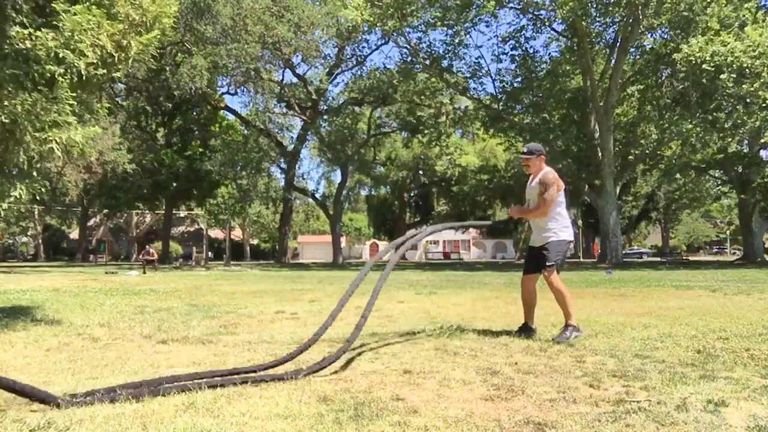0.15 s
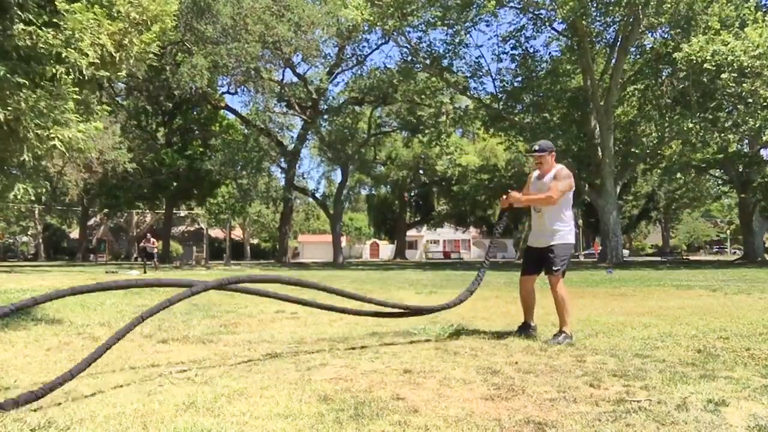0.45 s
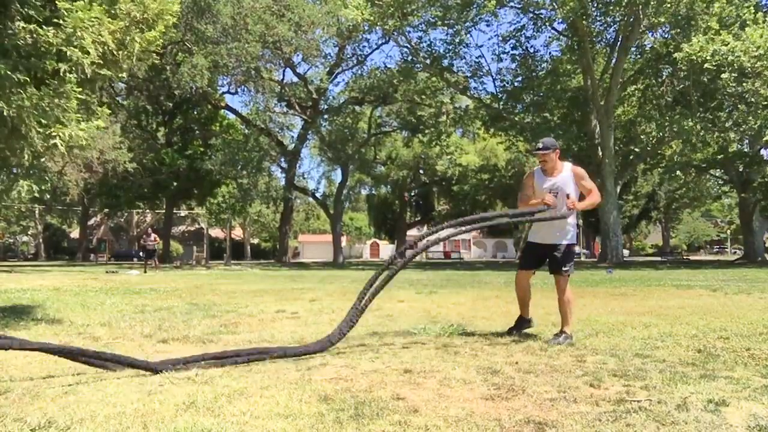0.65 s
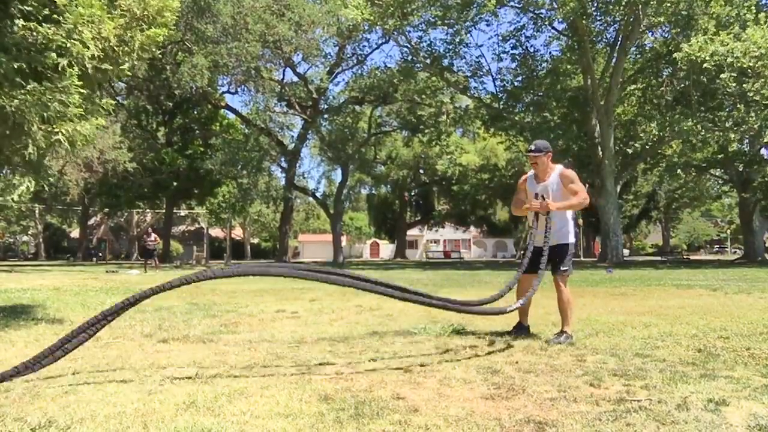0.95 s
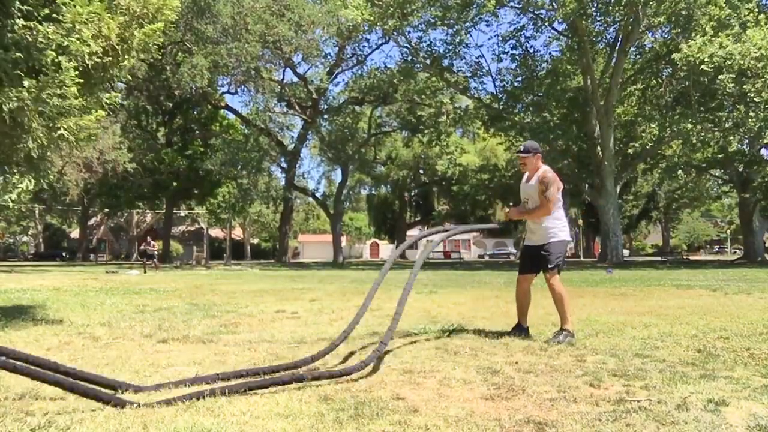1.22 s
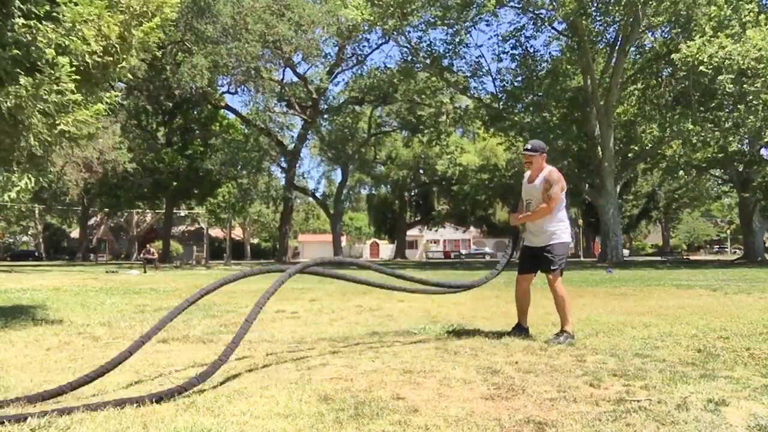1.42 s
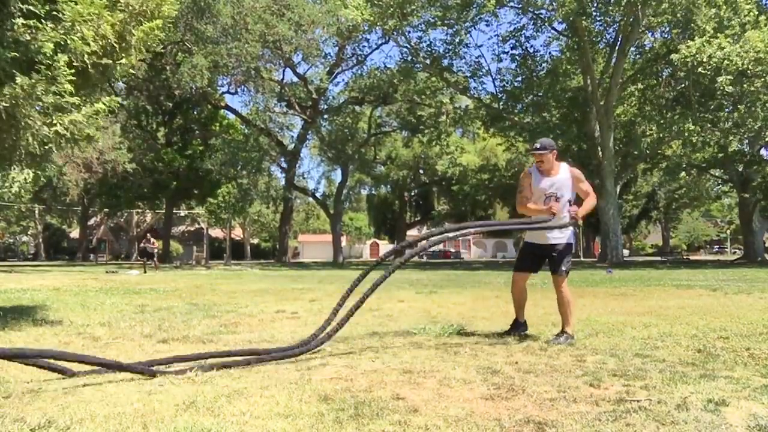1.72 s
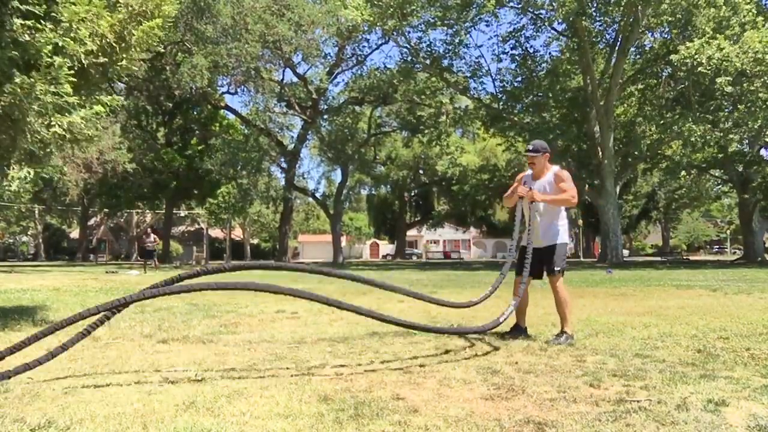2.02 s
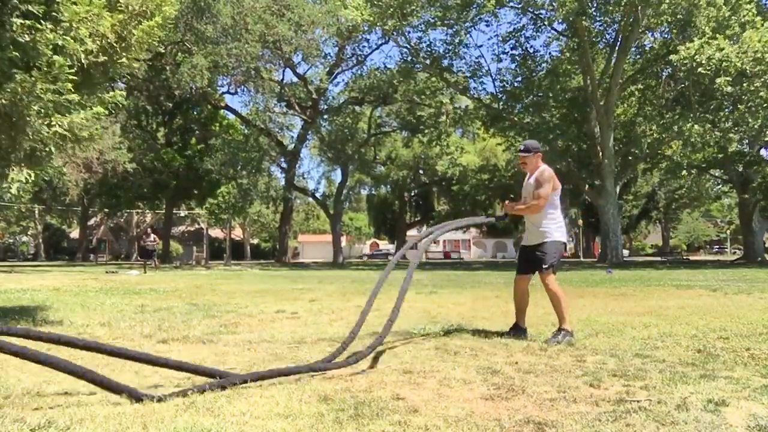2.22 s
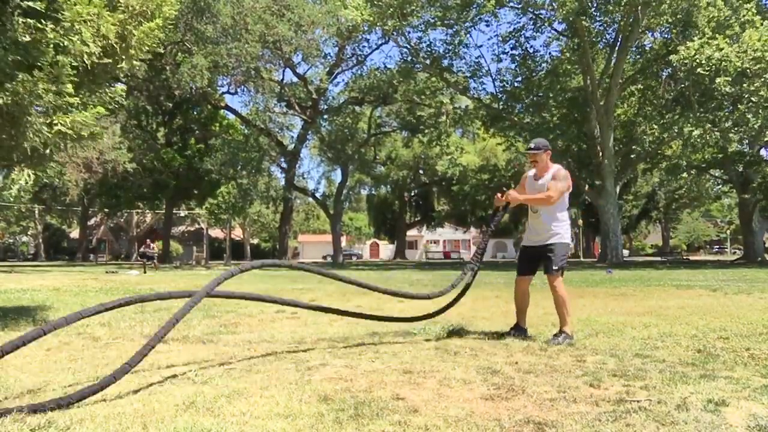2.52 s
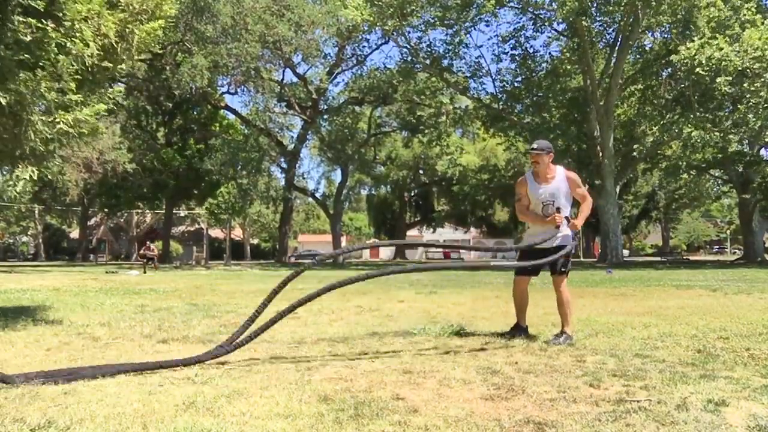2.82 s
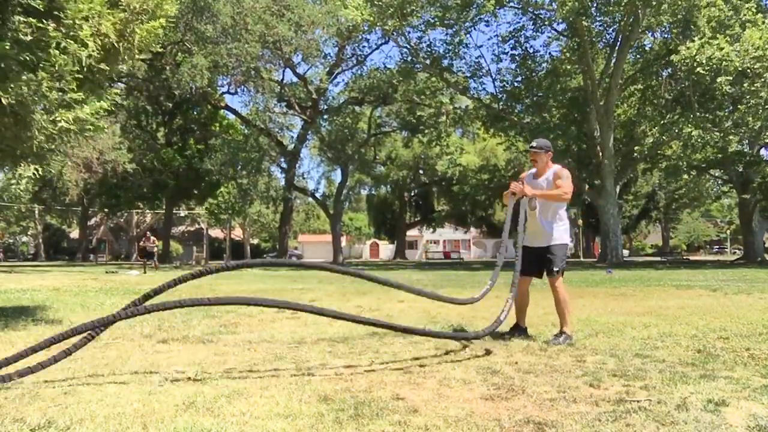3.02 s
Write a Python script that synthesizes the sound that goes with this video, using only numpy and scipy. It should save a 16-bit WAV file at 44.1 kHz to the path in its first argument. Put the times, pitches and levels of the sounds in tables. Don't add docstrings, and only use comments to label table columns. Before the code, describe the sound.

Battle ropes sweeping and slapping dry turf in waves, with low gusty wind buffeting outdoors

```python
import sys
import numpy as np
from scipy import signal
from scipy.io import wavfile
from scipy.ndimage import uniform_filter1d

SR = 44100
rng = np.random.default_rng(int(sys.argv[2]) if len(sys.argv) > 2 else 0)


def decibels_to_gain(level_db):
    exponent = np.asarray(level_db, float) / 20
    return 10 ** exponent


def int16_out(signal):
    q = np.round(np.clip(np.atleast_2d(signal).T, -1, 1) * 32767)
    wavfile.write(sys.argv[1], SR, q.astype(np.int16))


N = 138915


def rms_one(x):
    return x / np.sqrt(np.mean(x ** 2) + 1e-20)


def band(x, low_hz, high_hz):
    return signal.sosfilt(signal.butter(2, [low_hz, high_hz], "band", fs=SR, output="sos"), x)


def resonance(x, hz, width_hz):
    r = np.exp(-np.pi * width_hz / SR)
    return signal.lfilter([1], [1, -2 * r * np.cos(2 * np.pi * hz / SR), r * r], x)


def drift(rate_hz):
    r = np.exp(-80 * np.pi * rate_hz / SR)
    noise = rng.standard_normal(N // 40 + 2002)
    slow = signal.lfilter([1], [1, -2 * r, r * r], noise)[2000:]
    return np.interp(np.arange(N) / 40, np.arange(len(slow)), rms_one(slow))


def grains(per_s, spread_db):
    sizes = decibels_to_gain(spread_db * np.minimum(rng.exponential(1, N), 5))
    signs = rng.choice([-1, 1], N)
    happens = rng.random(N) < per_s / SR
    return rms_one(sizes * signs * happens)


def coloured(pair, spectrum, patchy_db):
    hz, db = np.transpose(spectrum)
    edges = 177 * 2 ** np.arange(0, 6.6, 0.5)
    out = 0
    for k, (low, high) in enumerate(zip(edges, edges[1:])):
        level_db = np.interp(np.log(low * high) / 2, np.log(hz), db)
        gain = decibels_to_gain(level_db + patchy_db * drift(14.7))
        out = out + gain * band(pair[k % 2], low, high)
    return rms_one(out)


def swells(s, rise, fall, db):
    grid = np.arange(0, N + 16, 16) / SR
    t = grid - np.asarray(s)[:, None]
    width = np.where(t < 0, np.asarray(rise)[:, None], np.asarray(fall)[:, None])
    peak_power = decibels_to_gain(db)[:, None] ** 2
    power = np.sum(peak_power * np.exp(-2 * (t / width) ** 2), axis=0)
    return np.interp(np.arange(N) / SR, grid, np.sqrt(power))


def evened(x):
    evenness = 0.55
    x = rms_one(x)
    local_power = uniform_filter1d(x ** 2, size=600) + 0.024
    return rms_one(x / local_power ** (evenness / 2))


def knocks(rows, cycles):
    half = 1800
    out, t = np.zeros(N + SR), np.arange(-half, half) / SR
    for s, db, hz in rows:
        i = int(s * SR)
        bell = np.exp(-(t * hz / cycles) ** 2 * 2)
        out[i - half:i + half] += decibels_to_gain(db) * bell * np.sin(2 * np.pi * hz * t)
    return out[:N]


# f/Hz, level/dB [per Hz]
PARK_SPECTRUM = [(150, -2), (250, -18.5), (603, -17.5), (1330, -17), (1850, -24), (3010, -27),
                 (3510, -31.5), (4390, -34), (15500, -45.5)]


def park():
    return decibels_to_gain(-57) * coloured(rng.standard_normal((2, N)), PARK_SPECTRUM, patchy_db=1.0)


# t/s, level/dB
STEADY_LEVEL = [(0.0, -49.5), (0.2, -44), (0.6, -45), (0.67, -59), (0.73, -44.5), (1.33, -47), (1.49, -48.5),
                (1.62, -43.5), (1.74, -43.5), (2.18, -48.5), (2.29, -42.5), (2.43, -45.5), (2.55, -43.5),
                (2.84, -42), (3.01, -41.5), (3.15, -49.5)]
# t/s, peak level/dB, flutter
# level above 200 Hz/dB [relative], length/s
AIR_EDDIES = [(0.204, -38, -40, 0.023), (0.282, -28, -24, 0.003), (0.485, -29, -17, 0.059),
              (0.513, -23, -13, 0.013), (0.537, -32, -26, 0.017), (0.558, -24, -36, 0.013),
              (0.59, -20.5, -15.5, 0.0076), (0.62, -21.5, -32, 0.0081), (0.628, -30.5, -29, 0.019),
              (0.657, -37.5, -37, 0.02), (0.754, -33.5, -16, 0.033), (0.768, -30.5, -10, 0.028),
              (0.792, -33.5, -11, 0.073), (0.825, -26, -7, 0.019), (0.843, -31, -10, 0.012),
              (0.851, -30.5, -7.5, 0.015), (0.87, -26.5, -9.5, 0.007), (0.877, -27.5, -6, 0.0098),
              (0.895, -34.5, -11.5, 0.037), (0.927, -30.5, -8.5, 0.023), (0.945, -25.5, -7.5, 0.0069),
              (0.963, -30.5, -8, 0.021), (1.045, -25.5, -20.5, 0.018), (1.077, -33.5, -36, 0.02),
              (1.17, -28, -19, 0.021), (1.195, -30.5, -18, 0.018), (1.26, -37.5, -17.5, 0.0092),
              (1.285, -35, -28, 0.023), (2.068, -40.5, -34, 0.025), (2.296, -34, -28, 0.033),
              (0.084, -55, -38, 0.0086), (0.126, -39, -38, 0.015), (0.362, -36.5, -18.5, 0.019),
              (0.425, -36, -24, 0.009), (1.107, -35, -26, 0.012), (1.126, -38, -31, 0.045),
              (1.424, -37, -27, 0.0079), (1.492, -37, -15.5, 0.014), (1.583, -39, -10, 0.017),
              (1.7, -49, -30, 0.019), (1.775, -32, -34, 0.0076), (1.919, -34.5, -20.5, 0.02),
              (2.13, -38, -18, 0.042), (2.383, -37, -15.5, 0.016), (2.548, -39.5, -10, 0.03),
              (2.629, -34.5, -14, 0.012), (2.739, -38, -28, 0.011), (2.813, -40, -33, 0.0056),
              (3.122, -38, -20, 0.011)]


def wind():
    gusty = grains(160, 2.5) + rng.standard_normal(N)
    rumble = resonance(rng.standard_normal(N), 80.6, 130)
    rumble = evened(band(rumble, 59.2, 265))
    thump = evened(band(resonance(gusty, 142.3, 141), 66, 266))
    low_hz, split_hz, high_hz = 206, 391, 600
    dull = evened(band(band(gusty, low_hz, split_hz), low_hz / 2, split_hz))
    bright = evened(band(band(gusty, split_hz, high_hz), low_hz, high_hz * 1.46))

    push_db = np.interp(np.arange(N) / SR, *np.transpose(STEADY_LEVEL)) + 1.0 * drift(21)
    steady = decibels_to_gain(push_db - 0.5) * (rumble + decibels_to_gain(-24) * dull)

    s, db, flutter_db, length = np.transpose(sorted(AIR_EDDIES))
    rise = 0.0071 + 0 * s
    length = np.clip(length, 0.004, 0.08)
    flutter_db = db + flutter_db + 4
    bright_db = flutter_db + 0.5 + 0.39 * (flutter_db + 28)
    thumps = swells(s + rise, rise, length, db - 3) * thump
    dull_flutter = swells(s + rise, rise, length * 0.55, flutter_db) * dull
    bright_flutter = swells(s + rise, rise * 0.52, length * 0.56, bright_db) * bright
    return steady + thumps + dull_flutter + bright_flutter


# t/s, length/s, start f/Hz, end f/Hz, level/dB
BIRD_CHIRPS = [(0, .11, 2850, 2830, -73.5), (.12, .04, 2850, 2800, -72), (1.4, .03, 3500, 3400, -70),
               (1.64, .03, 3950, 3600, -72), (1.662, .026, 3530, 3490, -68), (1.705, .025, 3520, 3500, -72),
               (1.745, .025, 5200, 5100, -69), (1.795, .025, 5150, 5200, -71),
               (1.828, .032, 3780, 3480, -66), (1.882, .02, 3450, 3400, -69), (2.18, .016, 3400, 3400, -69),
               (2.213, .026, 3600, 3500, -67), (2.243, .012, 3520, 3400, -64),
               (3.014, .014, 7200, 3400, -57), (3.019, .012, 6000, 3000, -64),
               (3.103, .01, 7900, 8500, -63)]


def birds():
    out = np.zeros(N + SR)
    wobble = 1 + 0.011 * np.resize(drift(120), N + SR)
    for s, length, start_hz, end_hz, db in BIRD_CHIRPS:
        i, n = int(max(s, 0) * SR), int(length * SR)
        hz = np.geomspace(start_hz, end_hz, n) * wobble[i:i + n]
        whistle = np.sin(2 * np.pi * np.cumsum(hz) / SR)
        out[i:i + n] += decibels_to_gain(db) * signal.windows.tukey(n, 0.6) * whistle
    lag = int(0.009 * SR)
    for turn in range(1, 4):
        out = out + 0.3 ** turn * np.roll(out, lag * turn + 97 * turn ** 2)
    return out[:N] * decibels_to_gain(2.5 + 3.5 * drift(28))


# loudest t/s, rise/s, fall/s, level/dB
ROPE_SWEEPS = [(.02, 0.068, 0.07, -62), (.15, 0.06, 0.11, -54), (.28, 0.054, 0.041, -58.5),
               (.37, 0.086, 0.086, -53), (.49, 0.043, 0.036, -53), (.74, 0.13, 0.2, -59),
               (.92, 0.03, 0.055, -57), (1.04, 0.093, 0.048, -60.5), (1.29, 0.096, 0.11, -52.5),
               (1.5, 0.12, 0.07, -53.5), (1.62, 0.077, 0.051, -57), (1.79, 0.078, 0.18, -55.5),
               (1.98, 0.045, 0.094, -55.5), (2.109, 0.038, 0.049, -56.5), (2.26, 0.047, 0.11, -53),
               (2.37, 0.064, 0.19, -52.5), (2.55, 0.073, 0.067, -53.5), (2.648, .03, 0.039, -57.5),
               (2.75, 0.059, 0.16, -60.5), (2.86, 0.12, 0.039, -55), (3.0, 0.098, 0.23, -58.5),
               (3.12, 0.031, 0.05, -57)]
# f/Hz, level/dB [per Hz]
SWISH_SPECTRUM = [(500, 10.5), (900, 9.5), (1500, 6), (2300, 1.5), (4500, -5), (7500, -5.5), (11000, -8.5),
                  (15500, -9)]


def sweeps():
    blades = [grains(4500, 3.86) + rng.standard_normal(N) for _ in range(2)]
    swish = coloured(blades, SWISH_SPECTRUM, patchy_db=1.6)
    return swells(*np.transpose(ROPE_SWEEPS)) * decibels_to_gain(1.14 * drift(29)) * swish


# centre t/s, peak level/dB, f/Hz
AIR_LUMPS = [(0.115, -34.5, 91), (0.435, -35, 100), (0.521, -31, 413), (0.548, -26, 123), (0.68, -32.5, 98),
             (0.785, -30, 141), (0.805, -28, 135), (0.87, -29, 600), (0.963, -35, 616), (1.01, -32, 99),
             (1.105, -34, 188), (1.183, -32, 182), (1.21, -38, 110), (1.43, -36, 98), (1.595, -36, 109),
             (1.68, -36, 85), (1.79, -39, 112), (2.075, -30.5, 168), (2.48, -34.5, 90), (2.6, -40, 98),
             (2.75, -35, 90), (2.82, -39, 101), (2.875, -37, 100), (3.04, -41.5, 168)]


def lumps():
    return knocks(AIR_LUMPS, cycles=1.53)


# centre t/s, peak level/dB, f/Hz
AIR_JOLTS = [(0.296, -30.5, 168), (0.497, -29, 313), (0.52, -17.5, 214), (0.566, -29, 190),
             (0.5965, -15.5, 120), (0.598, -26, 260), (0.614, -21, 207), (0.636, -28, 197),
             (0.76, -29.5, 140), (0.788, -38, 162), (0.831, -19, 510), (0.84, -22, 151), (0.84, -26, 630),
             (0.838, -42, 950), (0.857, -19, 255), (0.883, -36, 506), (0.905, -22, 200), (0.936, -35, 332),
             (0.957, -17.5, 125), (0.951, -47, 514), (0.972, -32, 130), (1.05, -26, 213),
             (1.081, -34.5, 211), (1.198, -27, 218), (1.265, -29.5, 139), (1.283, -26, 159),
             (2.305, -31, 160), (2.4, -38.5, 119)]


def jolts():
    return knocks(AIR_JOLTS, cycles=0.68)


# t/s, peak level/dB, length/s
ROPE_SLAPS = [(0.3746, -50, 0.0047), (0.484, -43.5, 0.0062), (0.49, -39, 0.014), (0.714, -48, 0.0044),
              (1.026, -40, 0.0095), (1.059, -43, 0.0039), (1.513, -44, 0.0068), (1.63, -35.5, 0.013),
              (2.102, -44.5, 0.0049), (2.123, -43, 0.0059), (2.5504, -39.5, 0.0042), (2.566, -36, 0.0038),
              (2.631, -30, 0.0038), (2.649, -31.5, 0.0027), (2.721, -46, 0.004), (3.027, -42, 0.0047),
              (3.103, -40.5, 0.0035), (3.12, -39, 0.01)]
# f/Hz, level/dB [per Hz]
SLAP_SPECTRUM = [(200, 23.5), (450, 16), (800, 7.5), (1500, 7.5), (2800, 4.5), (5000, -5.5), (8000, -3.5),
                 (15500, -16.5)]


def slaps():
    s, db, length = np.transpose(ROPE_SLAPS)
    rise = 0.0022 + 0 * s
    crackle = coloured([grains(6000, 3), grains(6000, 3)], SLAP_SPECTRUM, patchy_db=0)
    return crackle * swells(s + rise, rise, np.clip(length, 0.002, 0.03), db - 5.5)


# t/s, peak level/dB, f/Hz
STALK_TICKS = [(1.03, -57, 4000), (1.634, -48, 2300), (1.635, -40, 3000), (2.111, -43, 1800),
               (2.1205, -38.5, 1200), (2.1215, -39, 2800), (2.244, -43, 1010), (2.249, -44, 700),
               (2.559, -38, 1400), (2.633, -37, 1800), (2.632, -33, 5550), (2.649, -35, 1300),
               (2.722, -39, 1880), (3.1015, -38, 10000), (3.107, -40, 3000), (3.125, -53, 2000)]


def ticks():
    return knocks(STALK_TICKS, cycles=0.86)


def scene():
    air = wind() + lumps() + jolts()
    ropes = sweeps() + slaps() + ticks()
    return (park() + air + birds() + ropes)[None]


def roll_off(x):
    return signal.sosfilt(signal.butter(12, 16890, fs=SR, output="sos"), x)


def record(dry):
    x = signal.sosfilt(signal.butter(4, 42.5, "high", fs=SR, output="sos"), dry)
    overload = 0.28
    x = overload * np.tanh(x / overload)
    # centre Hz, sharpness, gain of the added peak (negative dips)
    for hz, sharpness, gain in [(7700, 7.0, -0.34), (1520, 5.0, 0.24), (1880, 7.0, -0.23), (15000, 5.0, 0.78)]:
        x = x + gain * signal.lfilter(*signal.iirpeak(hz, sharpness, fs=SR), x)
    x = signal.sosfilt(signal.ellip(12, 0.5, 70, 15750, fs=SR, output="sos"), x)
    return roll_off(x)


dry = scene()
out = record(dry)
int16_out(out)
```